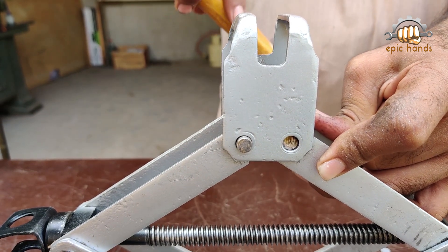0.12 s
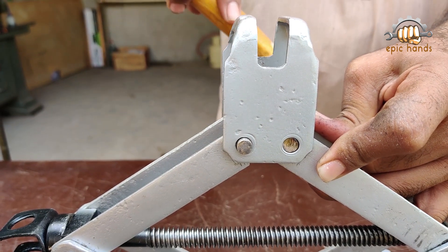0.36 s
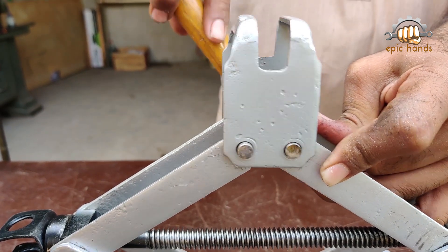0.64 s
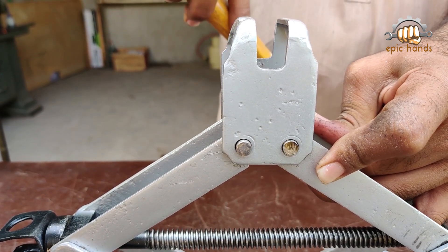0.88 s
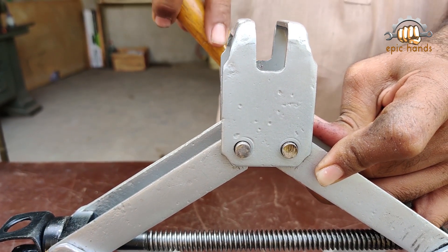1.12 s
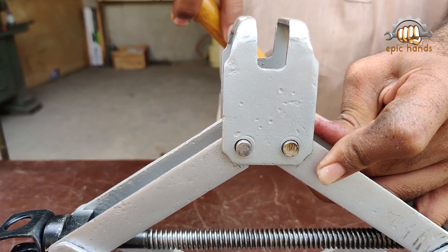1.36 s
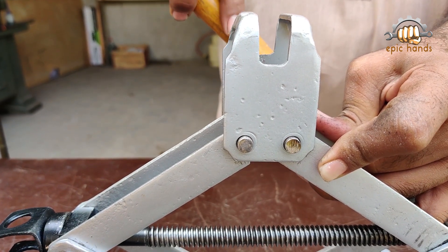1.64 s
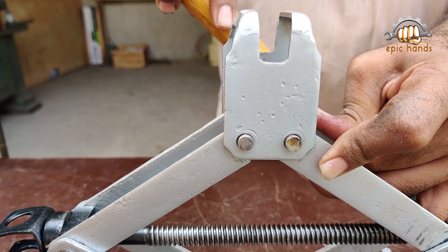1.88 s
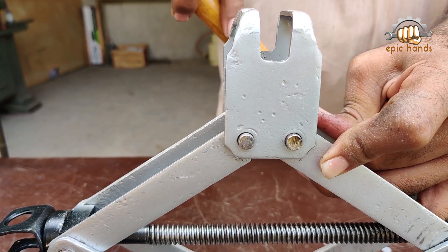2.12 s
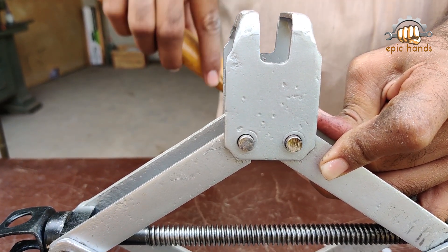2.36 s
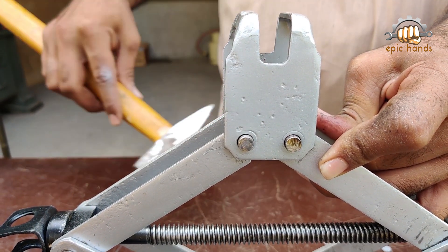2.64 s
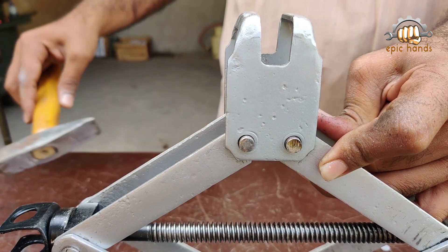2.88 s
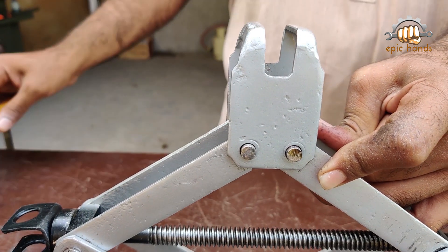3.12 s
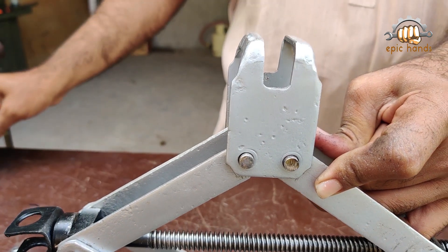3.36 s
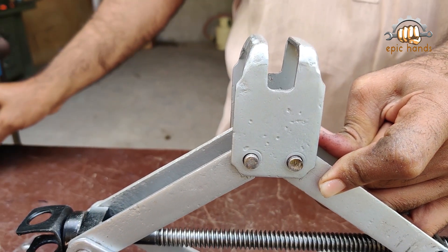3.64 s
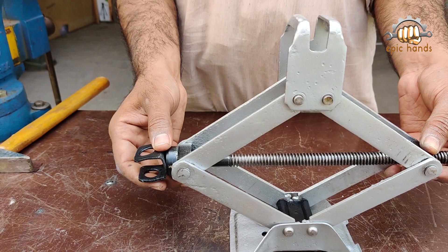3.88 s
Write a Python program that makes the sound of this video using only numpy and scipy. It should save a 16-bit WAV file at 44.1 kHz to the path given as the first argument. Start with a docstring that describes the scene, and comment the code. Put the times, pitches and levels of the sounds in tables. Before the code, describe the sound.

Hammer taps on a steel jack, five sharp even clicks, each thrown back as a dull thud

```python
"""First the end of a tap just struck, then five more: a hammer taps a pin into a steel scissor jack on a wooden bench.
Steel modes click and ring; a far wall throws each tap back as a dull double thud, and bench modes rumble after it.
A large workshop rings on in noise bands; far knocks, cloth and air on the microphone fill the pauses.
Only the right microphone works; the left input carries its own hiss, rumble and drift, and a trace of the steel.
An edit near the end cuts to silence and fades in again, at first without bass."""
import sys
import numpy as np
from scipy import signal
from scipy.io import wavfile

SR = 44100
rng = np.random.default_rng(int(sys.argv[2]) if len(sys.argv) > 2 else 0)


def master(y):
    """Save y as 16-bit WAV."""
    cut = np.clip(np.atleast_2d(y).T, -1, 1)
    pcm = np.round(cut * 32767)  # scale
    wavfile.write(sys.argv[1], SR, pcm.astype(np.int16))


def magnitude_from_level(level_db):
    """Linear magnitude for a level in decibels (20 dB per decade)."""
    exponent = np.asarray(level_db, float) / 20
    return 10 ** exponent


N = 176400
PRE = SR // 2  # samples of lead-in, so that sounds begun before the start are already under way
T = np.arange(N + PRE) / SR - PRE / SR  # seconds, 0 where the lead-in ends


def at_hz(points, hz):
    """Reads a table of (Hz, value) on a log-frequency axis."""
    table_hz, values = np.array(points).T
    return np.interp(np.log(hz), np.log(table_hz), values)


def drift(rate_hz):
    """Slow chance of spread 1: noise through two one-pole low-passes, drawn every 40 samples."""
    r = np.exp(-80 * np.pi * rate_hz / SR)
    noise = rng.standard_normal(len(T) // 40 + 2002)
    slow = signal.lfilter([1], [1, -2 * r, r * r], noise)[2000:]
    return np.interp(np.arange(len(T)) / 40, np.arange(len(slow)), slow / slow.std())


def clicks(times, sizes):
    """Impulses at the given times, over a tiny constant that keeps the filters off zero."""
    out = np.full(len(T), 1e-18)
    np.add.at(out, (np.asarray(times) * SR).astype(int) + PRE, sizes)
    return out


def ring(x, hz, t60):
    """Two-pole resonator: a unit click sets a sine of height 1 ringing."""
    r, w = magnitude_from_level(-60 / (t60 * SR)), 2 * np.pi * hz / SR
    return signal.lfilter([0, np.sin(w)], [1, -2 * r * np.cos(w), r * r], x)


def width_to_t60(width_hz):
    """Seconds in which a resonance of this bandwidth falls by 60 dB."""
    return np.log(1000) / (np.pi * width_hz)


def rough_tone(hz, width_hz):
    """Noise in one narrow resonance, rms 1: a tone that wavers as widely as its bandwidth."""
    tone = ring(rng.standard_normal(len(T)), hz, width_to_t60(width_hz))
    return tone / tone.std()


def dying(times, db, t60):
    """Power envelope that jumps at each time and dies away exponentially."""
    jumps = clicks(times, magnitude_from_level(2 * np.asarray(db)))
    return signal.lfilter([1], [1, -magnitude_from_level(-120 / (t60 * SR))], jumps)


def lump(start, length):
    """Envelope that swells and falls as a squared sine."""
    return np.sin(np.pi * np.clip((T - start) / length, 0, 1)) ** 2


def banded(power_at):
    """Half-octave noise bands; power_at(hz) gives each its power per Hz over time."""
    out, lows = 0, 18 * 2 ** np.arange(0, 10, .5)
    white = rng.standard_normal((2, len(T))) * np.sqrt(SR / 2)
    for k, low in enumerate(lows):
        bandpass = signal.butter(2, [low, low * np.sqrt(2)], "band", fs=SR, output="sos")
        band = signal.sosfilt(bandpass, white[k % 2])  # neighbouring bands use different noise
        out = out + band * np.sqrt(power_at(low * 2 ** 0.19))
    return out


def per_hz(spectrum, hz):
    """Power per Hz of a spectrum scaled to a total power of 1."""
    grid = np.arange(20., 16500, 10)
    total = 10 * np.sum(magnitude_from_level(2 * at_hz(spectrum, grid)))
    return magnitude_from_level(2 * at_hz(spectrum, hz)) / total


# Colour of the left input's own noise. Each row: frequency in Hz, relative level in dB per Hz.
LEFT_COLOUR = [(20, 5), (220, -15.5), (900, -23), (3600, -31.5), (6500, -45.5), (11000, -33), (16500, -28)]
# Its rumble below 200 Hz swells. Each row: time in seconds, gain in dB.
LEFT_RUMBLE = [(2.6, -3), (3.2, -0.5), (4, 6)]
LEFT_DB, LEFT_PATCHY_DB = -61.5, 4.5  # noise level, spread of the rumble's wandering


def left_input():
    """Steady hiss of an input without a working microphone, over a wandering rumble."""
    swell_db = np.interp(T, *np.transpose(LEFT_RUMBLE))

    def power_at(hz):
        rumble_db = (hz < 200) * (swell_db + LEFT_PATCHY_DB * drift(8.0))
        return per_hz(LEFT_COLOUR, hz) * magnitude_from_level(2 * (LEFT_DB + rumble_db))
    return banded(power_at)


# Room tone of the workshop. Each row: frequency in Hz, relative level in dB per Hz.
ROOM_COLOUR = [(15, -22), (25, 1.5), (70, -13.5), (202, -16), (280, -24.5), (538, -26.5), (1470, -33.5),
               (15200, -52)]
# Colour of the reverberation after a tap, then after its echo. Each row: frequency in Hz, relative level in dB per Hz.
TAP_TAIL_COLOUR = [(24, -31), (40, -3), (191, -2), (1090, -18.5), (4230, -21), (7010, -21), (14500, -32.5)]
ECHO_TAIL_COLOUR = [(24, -40), (40, 2), (222, -6), (823, -22), (5440, -28.5), (9010, -26), (14500, -52)]
# How long those tails last. Each row: frequency in Hz, time to fall by 60 dB in seconds.
TAP_TAIL_T60 = [(500, 0.43), (2000, 0.21), (14000, 0.12)]
ECHO_TAIL_T60 = [(200, 0.62), (2500, 0.93), (7000, 0.72), (14000, 0.32)]
# Cloth and skin. Each row: start in seconds, length in seconds before a stretch of 1.8, relative level in dB.
CLOTH = [(0.902, 0.043, -54.5), (2.372, .05, -60.5), (2.979, 0.027, -62), (3.01, 0.061, -59),
         (3.895, 0.079, -67)]
# Colour of the rustle. Each row: frequency in Hz, relative level in dB per Hz.
CLOTH_COLOUR = [(2500, 3), (8000, -1), (10000, -32.5), (16000, -15.5)]
ROOM_DB, ROOM_PATCHY_DB = -51.5, -0.15
TAP_TAIL_DB, ECHO_TAIL_DB, TREBLE_FROM_HZ = -4.5, -14.5, 1800


def workshop():
    """Room tone, rustles and the exponential tails of taps and echoes, as noise band by band."""
    taps, echoes = np.array(TAP_STRIKES), np.array(WALL_ECHOES)
    together = drift(2.9)  # wandering shared by all bands
    rustle = sum(magnitude_from_level(2 * db) * lump(s, 1.8 * length) for s, length, db in CLOTH)
    rustle = rustle * magnitude_from_level(6.4 * drift(90.0))

    def power_at(hz):
        # treble tails follow the steel and the echo's treble, low tails the bench and the thud
        treble = hz > TREBLE_FROM_HZ
        tap_db = np.where(treble, taps[:, 1] - 20, taps[:, 5]) + TAP_TAIL_DB
        echo_db = np.where(treble, echoes[:, 2] + 14, echoes[:, 1]) + ECHO_TAIL_DB
        tap = dying(taps[:, 0] + 0.0015, tap_db, at_hz(TAP_TAIL_T60, hz))
        echo = dying(echoes[:, 0], echo_db, at_hz(ECHO_TAIL_T60, hz))
        room = magnitude_from_level(2 * (ROOM_DB + ROOM_PATCHY_DB * (0.31 * together + drift(23.0))))
        tails = tap * per_hz(TAP_TAIL_COLOUR, hz) + echo * per_hz(ECHO_TAIL_COLOUR, hz)
        return room * per_hz(ROOM_COLOUR, hz) + tails + rustle * per_hz(CLOTH_COLOUR, hz)
    return banded(power_at)


# Knocks far off in the workshop. Each row: start in seconds, relative level in dB, lower resonance in Hz.
DISTANT_KNOCKS = [(0.077, -45.5, 677), (0.202, -49, 700), (0.576, -41, 528), (1.805, -48, 544),
                  (2.33, -51.5, 788), (2.448, -47.5, 753), (3.069, -47.5, 576), (3.447, -49.5, 750),
                  (3.911, -47, 571)]
KNOCK_WIDTH_HZ, KNOCK_HOLD_S, KNOCK_T60_S = 87, 0.03, 0.12
KNOCK_UPPER, KNOCK_UPPER_DB = 1.75, -1.5  # upper resonance: frequency ratio, gain


def far_knocks():
    """Smeared by distance: a short swell of noise in two resonances, with a dying tail."""
    out, t60 = 0, width_to_t60(KNOCK_WIDTH_HZ)
    for s, db, hz in DISTANT_KNOCKS:
        noise = rng.standard_normal(len(T))
        upper = ring(noise[::-1], KNOCK_UPPER * hz, t60 / 3)  # reversed noise is independent of the lower
        tone = ring(noise, hz, t60) + magnitude_from_level(KNOCK_UPPER_DB) * upper
        swell = np.clip((T - s) / 0.006, 0, 1)
        fall = magnitude_from_level(-60 * np.clip(T - s - KNOCK_HOLD_S, 0, 1) / KNOCK_T60_S)
        out = out + magnitude_from_level(db - 5.5) * swell * fall * tone / tone.std()
    return out


# Air on the microphone. Each row: time in seconds, relative rms level in dB.
AIR_LEVEL = [(2.4, -62.5), (2.406, -54.5), (3.67, -48)]
# Puffs on the capsule. Each row: time in seconds, relative peak in dB.
PUFFS = [(3.217, -41), (3.628, -33)]
GUST_HZ, PUFF_S = 69, 0.00076  # top of the gust noise, width of a puff


def air():
    """Lumpy low noise as air moves over the microphone, and two bell-shaped puffs on the capsule."""
    bandpass = signal.butter(2, [14, GUST_HZ], "band", fs=SR, output="sos")
    low = signal.sosfilt(bandpass, rng.standard_normal(len(T)))
    gusts = magnitude_from_level(np.interp(T, *np.transpose(AIR_LEVEL))) * low / low.std()
    return gusts + sum(magnitude_from_level(db) * np.exp(-((T - s) / PUFF_S) ** 2) for s, db in PUFFS)


# Each tap comes back from a far wall as two thuds. Each row: start in seconds, thud level in dB,
# treble level in dB, second thud in dB against the first, thud pitch in Hz.
WALL_ECHOES = [(-.045, -30, -43, -12.5, 140), (0.3633, -25, -41, -5, 138), (0.761, -19.5, -39.5, -5, 100),
               (1.182, -27, -43, -0.5, 188), (1.585, -27.5, -41, 0, 188), (1.984, -23, -42, -2, 217.5)]
# Delay of the second thud behind the first, one value per echo in seconds.
SECOND_THUD_DELAY = [.03, .028, .023, .034, .034, .034]
# Modes of the wooden bench. Each row: frequency in Hz, relative level in dB, time to fall by 60 dB in seconds.
BENCH_MODES = [(65.94, -2, 0.98), (136, -2.5, 0.97), (159, -6, .5), (202.3, -3.5, 0.93), (223.1, -5, 0.8),
               (310.9, -11.5, 0.57), (419, -7.5, 0.35), (472, -12, 0.8), (1451, -17, 0.56)]
BENCH_DB, BENCH_WIDTH, BENCH_DB_PER_OCTAVE = -13, 0.03, 5  # width as a share of the mode's frequency
THUD_DB = 7


def bench():
    """Each tap and echo is a soft thud with its own pitch; bench modes near that pitch rumble on roughly."""
    s, db, _, again_db, thud_hz = np.transpose(WALL_ECHOES)
    taps = np.array(TAP_STRIKES)
    # first thuds, second thuds, then the taps themselves
    times = np.r_[s + .002, s + SECOND_THUD_DELAY, taps[:, 0] + .002]
    levels = np.r_[db, db + again_db, taps[:, 5]]
    pitches = np.tile(thud_hz, 3)
    out = 0
    for t, level, hz in zip(times, levels, pitches):
        thud = ring(clicks([t], magnitude_from_level(level)), hz, 2.2 / hz)  # gone within about two cycles
        soften = signal.butter(2, 3.4 * hz, fs=SR, output="sos")
        out = out - magnitude_from_level(THUD_DB) * signal.sosfilt(soften, thud)
    for hz, level_db, t60 in BENCH_MODES:
        octaves_off = np.minimum(np.abs(np.log2(hz / pitches)), 1)
        chance_db = 1.6 * rng.standard_normal(len(times))
        mode_db = levels + level_db - BENCH_DB_PER_OCTAVE * octaves_off + BENCH_DB + chance_db
        envelope = np.sqrt(dying(times, mode_db, t60))
        envelope = signal.lfilter([.01], [1, -.99], envelope)  # soft onset
        out = out + envelope * rough_tone(hz, BENCH_WIDTH * hz)
    return out


# Taps of the hammer. Each row: start in seconds, relative strength in dB, gain in dB of modes under 6.2 kHz,
# gain in dB of modes over 10 kHz, gain in dB of the long ring, bench level in dB, two favoured modes in Hz.
TAP_STRIKES = [(-.13, -15.5, 0, 2, -6, -25, 7450, 12210), (0.2778, -13, -1, 3.5, 6.5, -31, 9035, 12210),
               (0.6774, -12.5, 3.5, 6, 2, -29, 9035, 14200), (1.1, -12, 5, 3, 0, -32, 6850, 12210),
               (1.506, -9.5, -2.5, -3.5, 1.5, -33.5, 4544, 12210),
               (1.904, -9, 1, -3, -3.5, -27.5, 7200, 6850)]
# Light ticks of hammer and pin. Each row: start in seconds, relative strength in dB, gain in dB of modes under 3.5 kHz.
PIN_TICKS = [(0.705, -33, 14), (.9143, -43.5, 12.5), (3.3094, -53, 18.5)]
# Modes of jack and hammer. Each row: frequency in Hz, width in Hz of the rough long ring.
STEEL_MODES = [(2510, 90), (2950, 90), (3750, 120), (4544, 25), (4805, 60), (5900, 70), (6850, 50),
               (7450, 60), (8000, 80), (9035, 45), (10680, 30), (12210, 10), (12990, 25), (14200, 70)]
# Strength of the same modes. Each row: relative level in dB in the click, relative level in dB in the long ring.
STEEL_MODE_DB = [(-19.5, -1.5), (-14, -7), (-12.5, -12), (-3, -5.5), (-8, -11), (-5.5, -10), (-5.5, -1),
                 (-4.5, -3.5), (-0.5, -5.5), (-3.5, -2), (-16.5, -14.5), (-15, -7.5), (-10.5, -11),
                 (-9, -4)]
CONTACT_S, CLICK_DB, CLICK_SPREAD_DB, CLICK_WIDTH_HZ = 0.00052, 4, 2.5, 191  # CONTACT_S spaces the pushes
RING_DB, RING_SPREAD_DB, RING_T60_S = -42, 1, 0.34
RING_ECHO_DB, RING_ECHO_T60_S = -4, 0.31  # the ring's return, against the ring itself
FAVOUR_DB, STEEL_FROM_HZ = 6, 2400


def steel():
    """A contact of four random pushes clicks in the modes; after taps they ring on roughly, and again in the echo."""
    s, db, low_db, high_db, ring_db, _, *tap_hz = np.transpose(TAP_STRIKES)
    tick_s, tick_db, dull_db = np.transpose(PIN_TICKS)
    echo_s = np.array(WALL_ECHOES)[:, 0]
    hit_s, out = np.r_[s, tick_s], 0
    for (hz, width_hz), (click_db, long_db) in zip(STEEL_MODES, STEEL_MODE_DB):
        favoured = (np.abs(np.log(np.array(tap_hz) / hz)) < .03).any(axis=0)
        tap_db = db + low_db * (hz < 6200) + high_db * (hz > 10000) + FAVOUR_DB * favoured
        hit_db = np.r_[tap_db, tick_db + dull_db * (hz < 3500)]

        lags = CONTACT_S * (np.arange(4) + rng.uniform(0, 0.69, (len(hit_s), 4)))
        push_db = CLICK_DB + click_db + CLICK_SPREAD_DB * rng.standard_normal(lags.shape)
        sizes = magnitude_from_level(hit_db[:, None] + push_db) * rng.choice([-1, 1], lags.shape) / 4
        pushes = clicks((hit_s[:, None] + lags).ravel(), sizes.ravel())
        out = out + ring(pushes, hz, width_to_t60(CLICK_WIDTH_HZ))

        tail_db = tap_db + ring_db + long_db + RING_DB + RING_SPREAD_DB * rng.standard_normal(len(s))
        power = dying(s, tail_db, RING_T60_S)
        power = power + dying(echo_s, tail_db + RING_ECHO_DB, RING_ECHO_T60_S)
        out = out + np.sqrt(power) * rough_tone(hz, width_hz)
    return signal.sosfilt(signal.butter(2, STEEL_FROM_HZ, "high", fs=SR, output="sos"), out)


RIGHT_DB, LEAK_DB = 4, -61  # gain of the working microphone, steel in the left against the right


def scene():
    """Right hears the workshop; left only its own noise and a trace of the steel."""
    metal = steel()
    right = magnitude_from_level(RIGHT_DB) * (workshop() + far_knocks() + air() + bench() + metal)
    left = left_input() + magnitude_from_level(LEAK_DB + RIGHT_DB) * metal
    return np.array([left, right])[:, PRE:]


def roll_off(x):
    """The treble ends steeply here."""
    return signal.sosfilt(signal.butter(12, 16850, fs=SR, output="sos"), x)


# Offset of the left input. Each row: time in seconds, level added before the peaks are rounded.
LEFT_OFFSET = [(3.868, 0), (3.885, .004), (3.92, .033), (3.98, .043)]
CUT_S, BACK_S, BASS_BACK_S = 3.682, 3.731, 3.868  # silence begins, fade-in begins, bass returns
FADE_S, BASS_CUT_HZ = 0.084, 142
OVERLOAD = .95  # ceiling of the rounded peaks


def record(dry):
    """The edit: silence, a fade-in without bass, the bass returns; the left input drifts; peaks are rounded."""
    t = T[PRE:]
    thin = signal.sosfilt(signal.butter(2, BASS_CUT_HZ, "high", fs=SR, output="sos"), dry)
    faded_in = thin * np.clip((t - BACK_S) / FADE_S, 0, 1)
    edited = np.where((t > CUT_S) & (t < BASS_BACK_S), faded_in, dry)
    drifted = edited + [[1], [0]] * np.interp(t, *np.transpose(LEFT_OFFSET))
    mix = OVERLOAD * np.tanh(drifted / OVERLOAD)
    return roll_off(mix)


dry = scene()
out = record(dry)
master(out)
```